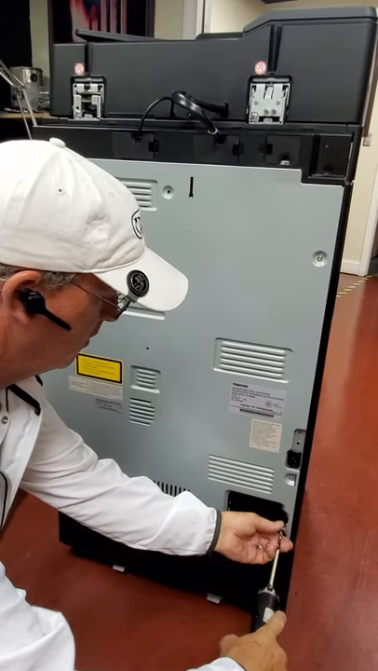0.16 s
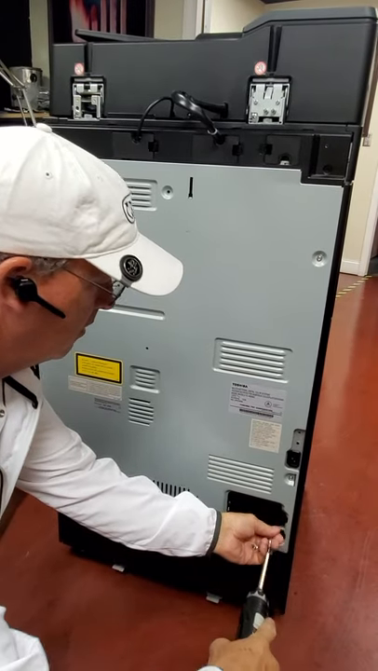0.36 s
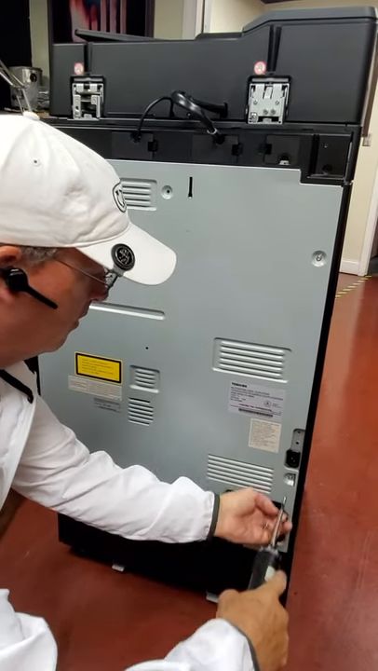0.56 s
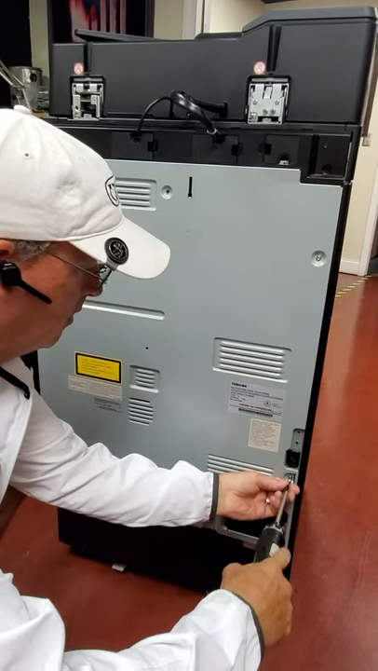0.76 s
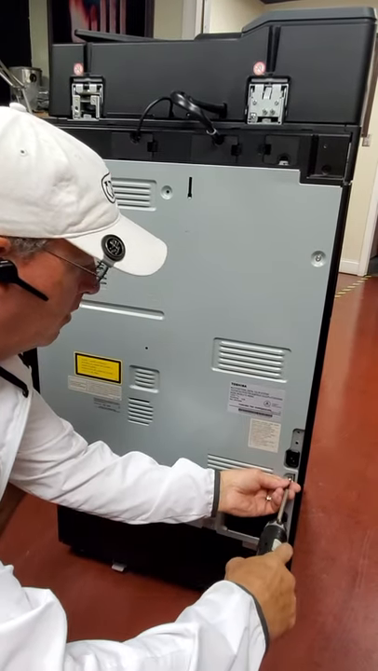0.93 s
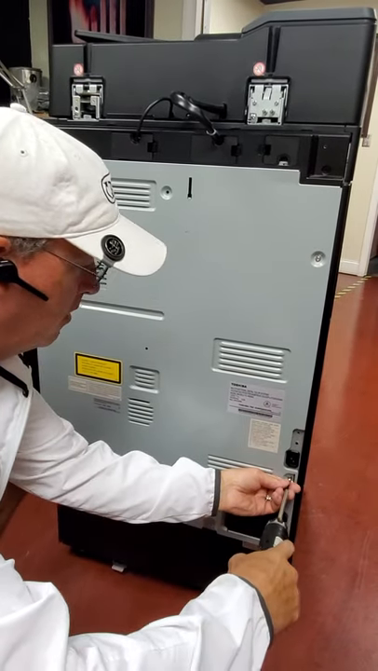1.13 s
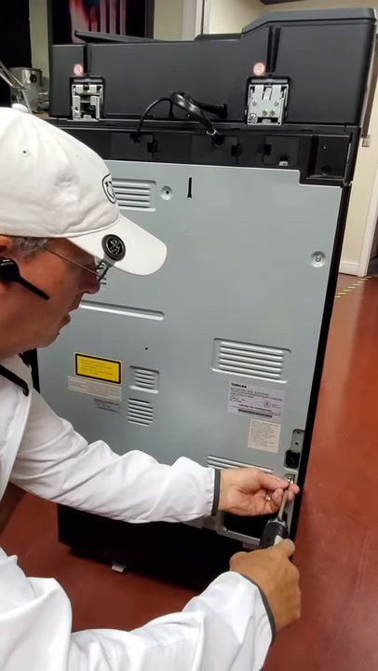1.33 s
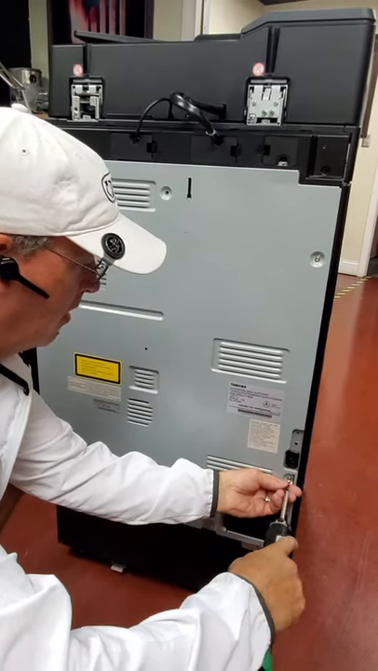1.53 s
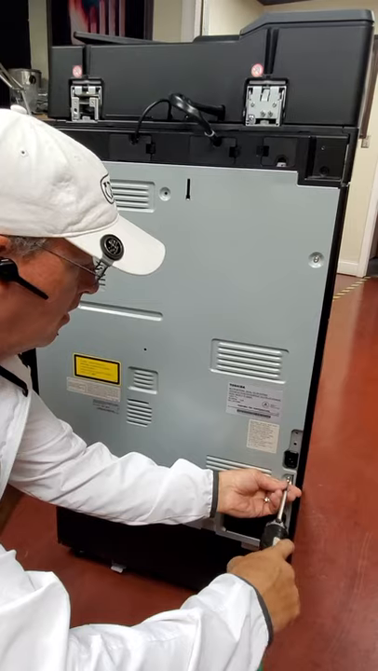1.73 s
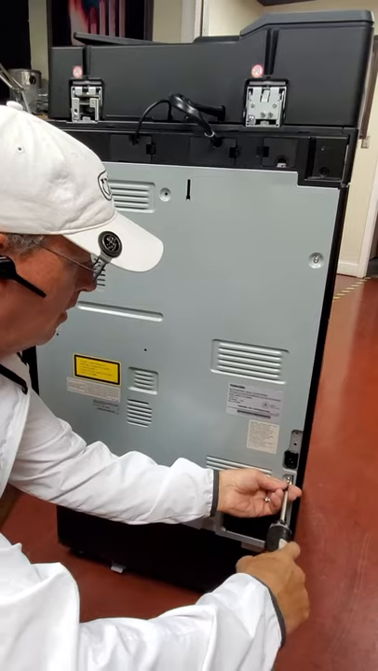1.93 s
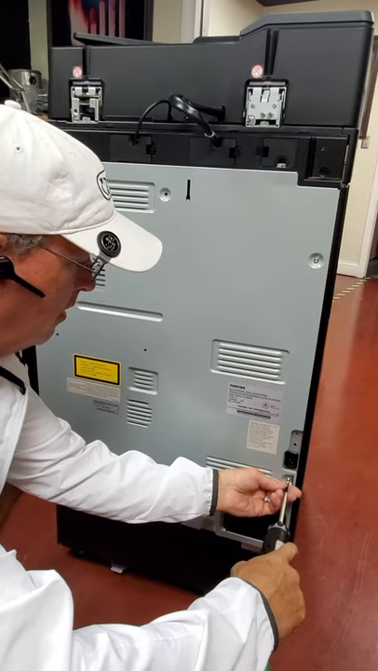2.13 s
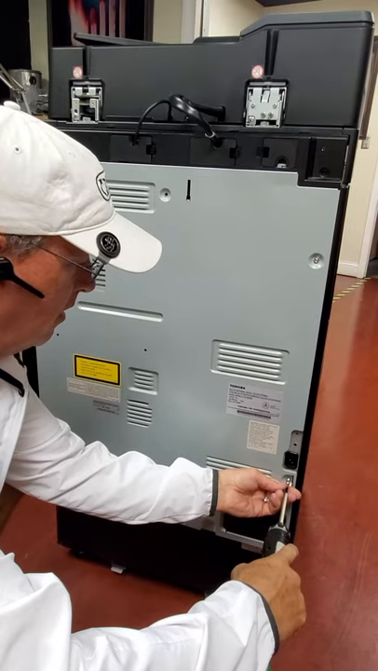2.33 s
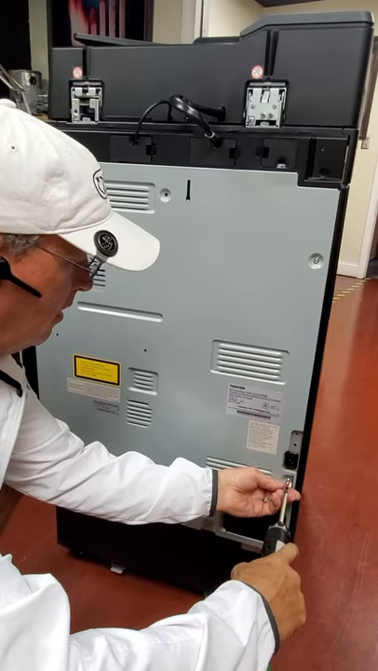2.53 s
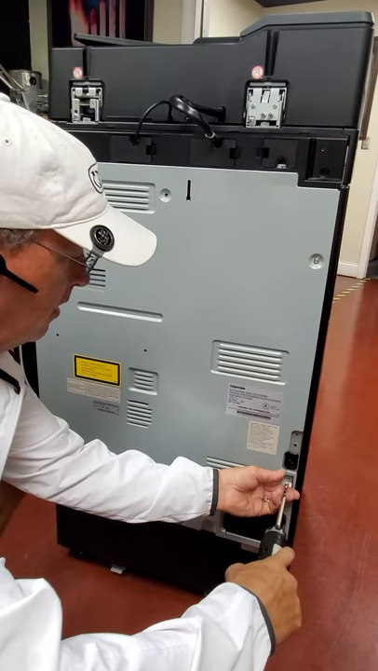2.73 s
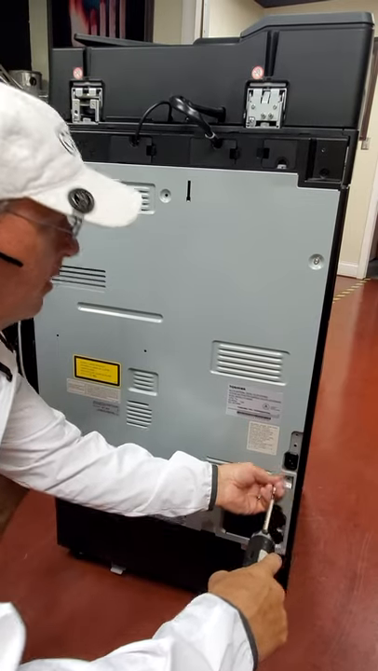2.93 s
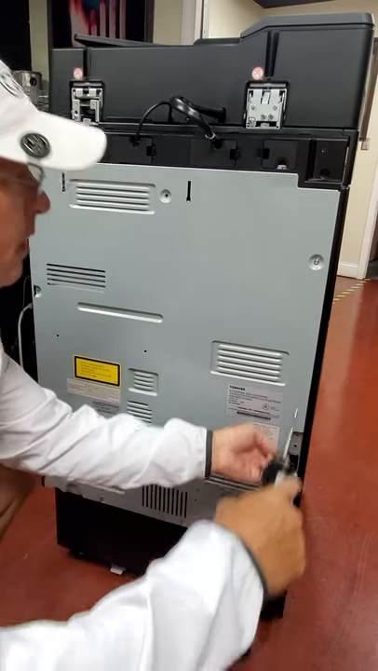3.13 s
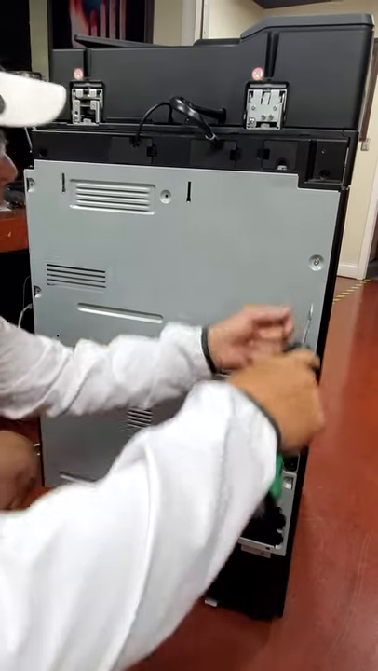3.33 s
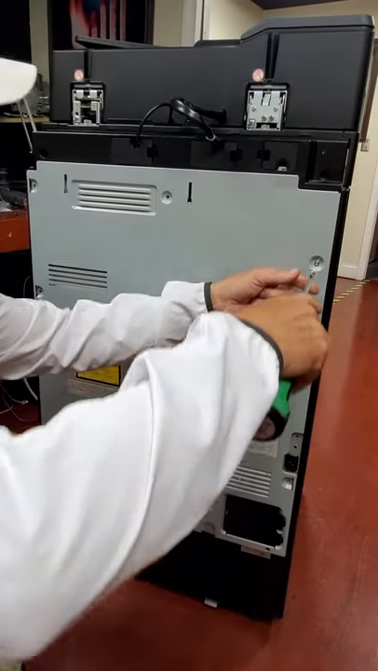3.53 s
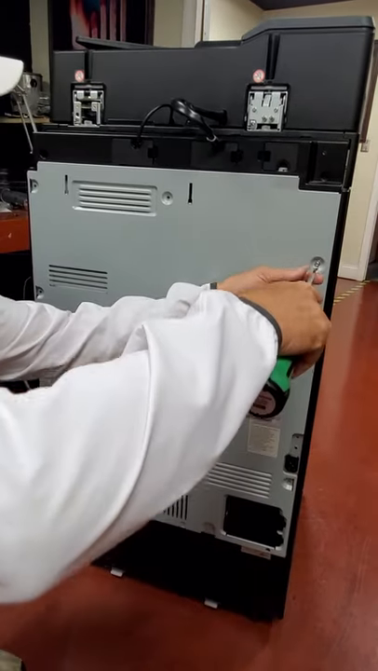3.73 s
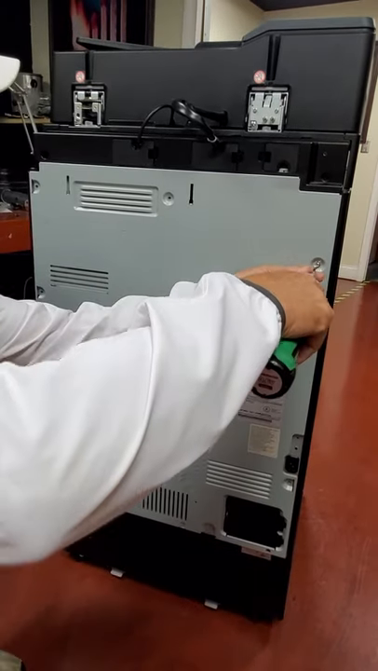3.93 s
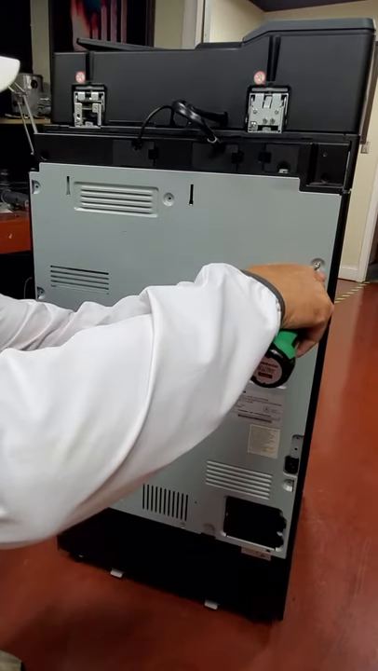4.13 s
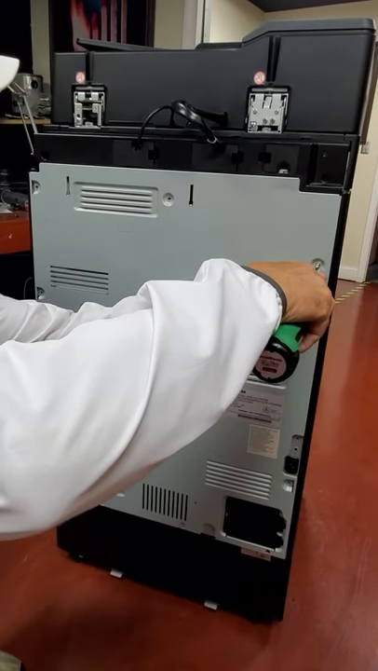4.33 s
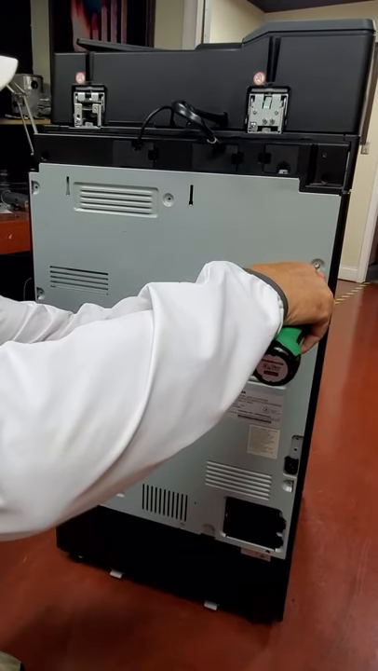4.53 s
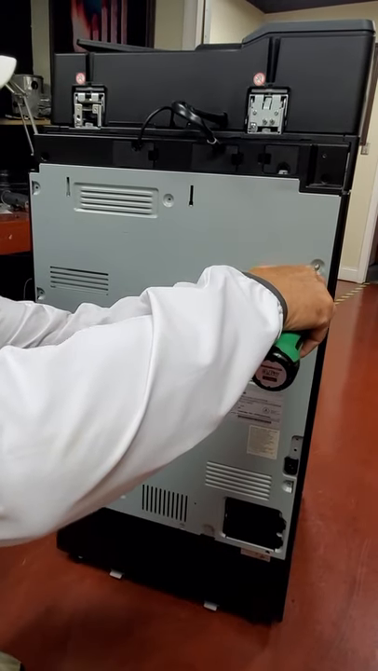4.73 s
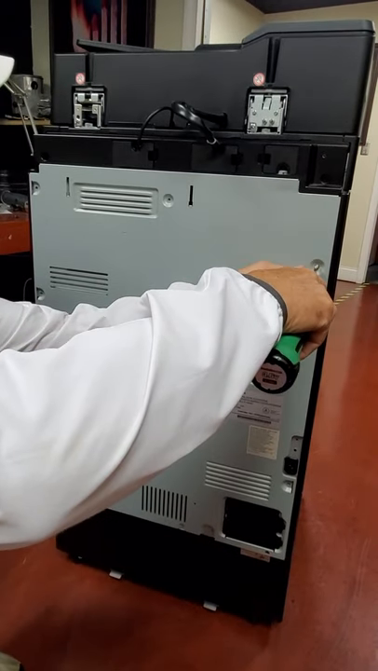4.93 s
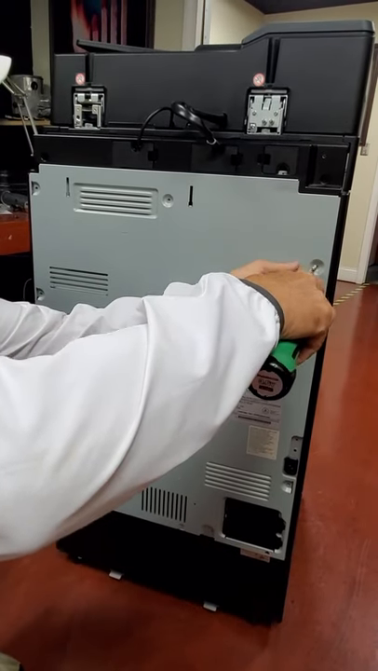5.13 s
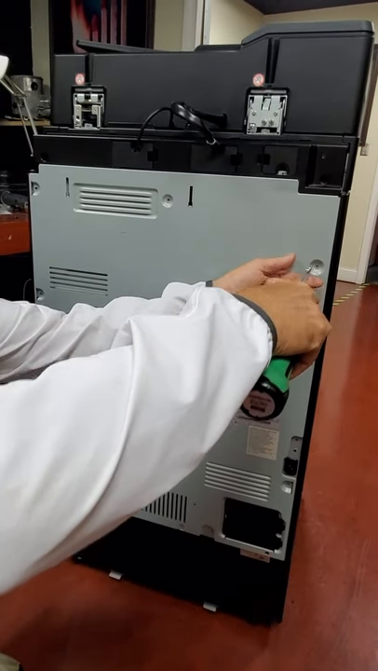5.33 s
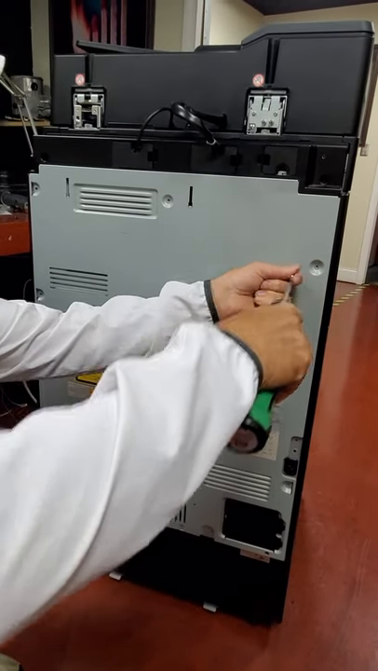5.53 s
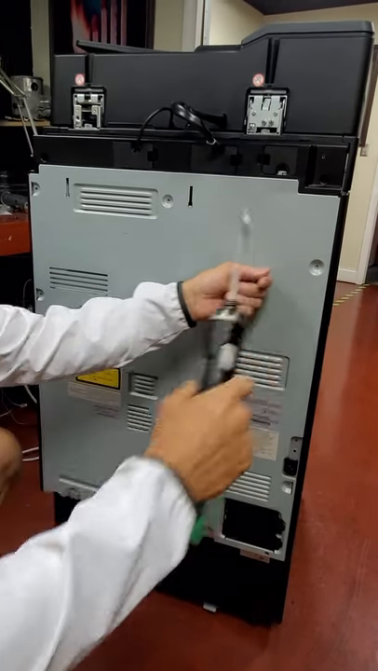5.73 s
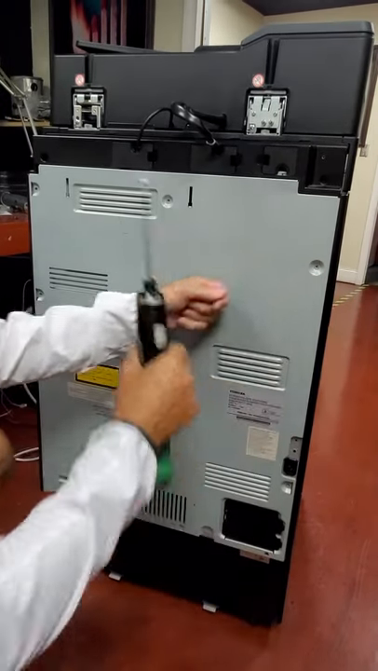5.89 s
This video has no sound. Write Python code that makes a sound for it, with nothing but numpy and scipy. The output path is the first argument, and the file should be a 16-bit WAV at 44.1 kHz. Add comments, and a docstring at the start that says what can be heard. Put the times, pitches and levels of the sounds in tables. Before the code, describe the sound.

Close stereo sound in a small, hard-surfaced room. A handheld electric screwdriver's gritty gear rattle and high whine fall away; faint taps follow. Two trigger bursts come next, the first longer, the second shorter, each with a brief coarse rasp as a screw loosens from a thin resonant panel, then a falling whirr. Between them the steel bit skids, clicks and bumps on metal. A few faint clicks end it over quiet room noise.

```python
"""Motor and gears coast to a stop at the start; two powered runs of a cordless screwdriver follow.
Motor orders whine, and tooth strikes excite the gear housing. In the later runs a screw rasps by stick-slip
as it is backed out of a cooker's sheet-metal panel. Slides, bumps, taps and scrapes excite the steel bit
and the sheet as impulses or friction noise. A small hard room adds diffuse echoes and faint steady noise."""
import sys
import numpy as np
from scipy import signal
from scipy.fft import rfft, irfft
from scipy.io import wavfile
from scipy.ndimage import uniform_filter1d

SR = 44100
rng = np.random.default_rng(int(sys.argv[2]) if len(sys.argv) > 2 else 0)


def unload_audio(sound):
    """Save the sound as a 16-bit wav file, at the path given as the first command line argument."""
    columns = np.transpose(np.atleast_2d(sound))
    # keep every value between -1 and 1, then stretch to whole-number steps
    steps = np.round(np.clip(columns, -1, 1) * 32767)
    wavfile.write(sys.argv[1], SR, steps.astype(np.int16))


N = 262836
TIME = np.arange(N) / SR

# Levels in the tables are relative to the gains of the functions that use them.
# trigger pulls: pressed_s, released_s, driven_rattle_db, coasting_rattle_db, friction_turns_per_s2
TRIGGER_PULLS = [(-.3, 0.032, -31, -30.5, 326), (1.444, 2.64, -31.5, -29, 335),
                 (4.305, 5.093, -31.5, -29, 270)]
# motor speed under power, one curve a run, before spin-up and flutter: time_s, speed_turns_per_s
POWERED_SPEED = [
    [(0, 330)],
    [(1.8, 324), (1.97, 338), (2.04, 339), (2.13, 335.5), (2.33, 341.5), (2.52, 342), (2.62, 337)],
    [(4.47, 324), (4.55, 333.5), (4.73, 336), (4.82, 344.5), (5.09, 346)],
]
# tones of motor and gears at full speed: multiple_of_motor_speed, first_run_db, second_run_db, third_run_db
MOTOR_ORDERS = [(1, -51, -59, -55), (2, -52.5, -64.5, -53), (3, -55, -55, -52), (3.5, -51, -73, -49.5),
                (4, -48, -55.5, -51.5), (5, -60, -51.5, -56), (5.5, -71, -71, -49), (9, -74, -56.5, -53),
                (9.5, -47.5, -49, -49), (10.5, -63, -58, -55), (12, -42, -51, -55), (17.5, -38.5, -49, -58),
                (18, -59, -51, -53)]
# narrow housing resonances that strengthen a passing tone: centre_hz, width_hz, boost_db
HOUSING_MODES = [(1007.7, 7.8, 14), (1360, 8, 11), (2971, 53, 13)]
# gearbox spectrum under power: frequency_hz, level_db
DRIVEN_SPECTRUM = [(60, -36.5), (130, -26), (330, -13), (480, -25), (780, -16), (1050, -8.5), (1400, -3),
                   (2200, -7), (3400, -1.5), (5200, -7.5), (6200, -5.5), (8000, -11), (9500, -23),
                   (15500, -6.5)]
# gearbox spectrum while coasting: frequency_hz, level_db
COASTING_SPECTRUM = [(150, -63), (320, -22.5), (500, -27), (800, -19), (1000, -18.5), (1300, -0.5),
                     (1600, 1.5), (2300, -6.5), (4100, -4), (4800, -7.5), (7200, -8.5), (9300, -23),
                     (15500, -14)]
# balance of the gearbox between the ports: frequency_hz, left_minus_right_db
PORT_BALANCE = [(150, 0), (350, -4.5), (700, -1.5), (1300, -0.5), (2600, -3), (4200, -8), (6500, 3),
                (9000, 7), (15000, 6)]
# unscrewing: bite_s, tightest_s, bite_db, tightest_db, loosening_db_per_s, turn_swell_db
SCREW_FRICTION = [(1.464, 1.646, -27, -27.5, 85, 1.2), (4.369, 4.655, -44, -34, 135, 5.5)]
# rasp spectra of the low and then the high screw: frequency_hz, level_db
RASP_SPECTRA = [
    [(45, -45), (62, -13), (80, -5), (115, -4.5), (380, -7), (550, -13), (1000, -10), (2000, -9.5),
     (4000, -10), (8000, -35)],
    [(45, -56), (62, -21), (85, -1), (160, -3.5), (330, 3.5), (500, -2), (700, -6), (1200, -10.5),
     (3000, -1), (8000, -52)],
]
# bit sliding over the screw head: start_s, length_s, level_db
BIT_SLIDES = [(1.213, 0.028, -52), (1.321, 0.044, -47.5), (3.444, 0.11, -41), (3.594, .05, -50),
              (4.093, 0.031, -36.5), (5.31, 0.021, -49.5), (5.61, 0.085, -52)]
# friction spectrum of a slide: frequency_hz, level_db
SLIDE_SPECTRUM = [(41, -46.5), (70, -13), (173, -2.5), (266, -8.5), (309, 1.5), (427, -8), (832, -5),
                  (1080, -9), (3090, -13), (8880, -34), (12000, -63), (15600, -32), (22000, -120)]
# soft bumps of hand and tool body on the panel: start_s, level_db, pitch_hz, decay_s (time constant)
BODY_BUMPS = [(1.351, -44, 150, .022), (1.407, -47, 140, .02), (3.436, -19.5, 302, 0.0019),
              (3.514, -21, 330, 0.0012), (4.122, -33, 242, 0.002), (4.657, -21.5, 300, 0.0064),
              (5.312, -39.5, 255, 0.0049), (5.943, -49.5, 328, 0.0066)]
# taps of bit and screws on the metal: time_s, clack_db, panel_thud_db, bright_tick_db
METAL_TAPS = [(.52, -71, -64.5, -58), (0.675, -55.5, -74, -56), (1.098, -38, -49.5, -58),
              (1.259, -40.5, -47, -73), (1.446, -40, -50, -45), (1.468, -28.5, -48, -46),
              (2.738, -54, -57, -24), (2.765, -51, -69, -28.5), (3.46, -43.5, -45.5, -38.5),
              (3.569, -40, -67, -38.5), (3.923, -41, -48.5, -39), (4.062, -46.5, -52, -44.5),
              (4.084, -37.5, -41.5, -59), (4.121, -40.5, -44, -47.5), (4.269, -52.5, -69, -53),
              (4.321, -38.5, -74, -62), (4.419, -27.5, -37, -25), (4.543, -28, -36.5, -39),
              (4.647, -30, -37.5, -30), (5.626, -46, -54.5, -68), (5.753, -45, -73, -50),
              (5.762, -63, -74, -52), (5.896, -53, -65, -49.5)]
# spectrum of the clack on steel: frequency_hz, level_db
CLACK_SPECTRUM = [(30, -55), (150, -25.5), (500, -4.5), (780, -18), (1100, 4), (1600, 4.5), (2200, 2),
                  (3000, 4.5), (4900, -1.5), (6200, -11), (9000, -30.5)]
# spectrum of the panel thud: frequency_hz, level_db
THUD_SPECTRUM = [(25, -45), (50, -34), (110, -11), (280, -8), (450, -2), (720, 11), (1000, -3.5),
                 (1800, -57)]
# spectrum of the tick at the bit's tip, and of the scrapes: frequency_hz, level_db
TICK_SPECTRUM = [(100, -80), (3500, -33), (6000, 0), (8000, 6), (9200, -8), (12000, -0.5), (15500, 5)]
# loose screw scraping across the tip of the bit: middle_s, length_s, level_db
TIP_SCRAPES = [(0.132, 0.094, -33.5), (0.674, .016, -53), (2.743, .05, -30), (5.768, 0.011, -32)]
# modes of the steel bit and its holder: frequency_hz, level_db, t60_s
BIT_MODES = [(1392, 6, 0.51), (1574, -7, 1), (1660, 0, 0.72), (2690, -9, .2), (3550, -5, 0.28),
             (4080, -11, 0.18)]
# modes of the sheet-metal panel: frequency_hz, level_db, t60_s
PANEL_MODES = [(103, -14, 0.43), (138.6, -15, 0.15), (167, -27, 0.42), (224, -26, 0.33), (276, -4, 0.75),
               (322.3, 17, 0.48), (384.7, 11, 1), (564.3, 12.5, 0.39), (727, 17.5, 0.1), (1210, -10, 0.213),
               (1770, 7, 0.35)]
# reverberation of the room: frequency_hz, t60_s
ROOM_DECAY = [(100, 0.39), (250, 0.47), (550, 0.51), (1400, 0.36), (3700, 0.35), (9700, 0.35),
              (16000, 0.28)]
# spectrum of the still room: frequency_hz, level_db
HUSH_SPECTRUM = [(15, -13), (25, -49), (63, -4.5), (145, -18.5), (180, -19), (206, -17), (373, -11.5),
                 (439, -19.5), (754, -12.5), (936, -19.5), (1330, -16.5), (1940, -19), (7920, -26),
                 (9070, -42), (16000, -24)]

TEETH = 9  # on the motor pinion
FULL_SPEED = 340  # turns per second, reference for pace
SPIN_UP_S, DRAG_S = .11, .5  # rise time; time constant of the speed-proportional drag
RATTLE_GROWTH, LOAD_DB = 1.458, 1.5  # exponent of pace; rise of the rattle while a screw is tight
MESH_DB, MESH_WIDTH_HZ = 13, 230  # whirr of the coasting gears
BITE_S, SCREW_TURN_S = .035, 0.1074  # time for the thread to bite; one turn of a screw
SLIDE_ATTACK_S, SLIDE_FADE_DB_PER_S = 0.029, 223
HUSH_DB = -69
PORT_GAP_S = 0.00054  # sound's travel time between the two listening ports
EDGE_HZ = 16000


def motor_speed(pressed, released, friction, powered):
    """Rotational dynamics: spin-up, powered speed, then viscous drag and dry friction; in turns per second."""
    spin_up = 1 - (1 - np.minimum(since(pressed) / SPIN_UP_S, 1)) ** 2
    speed = spin_up * np.interp(TIME, *np.transpose(powered))
    slowing = np.exp(-since(released) / DRAG_S)
    speed = np.maximum(speed * slowing - friction * DRAG_S * (1 - slowing), 0)
    flutter = 1 + .002 * wander(hz=30.11)
    return speed * flutter


def gear_teeth(speed, spread_db=3.5, throb=0.24, backlash=.15):
    """Periodic impact: each pinion tooth strikes once a turn, unevenly and harder on one side of the shaft."""
    turns = np.cumsum(speed) / SR
    tooth_phase = TEETH * turns + backlash * wander(hz=900)
    strikes = np.diff(np.floor(tooth_phase), prepend=0) > 0
    size = amp(spread_db * rng.standard_normal(N)) * (1 + throb * np.cos(2 * np.pi * turns))
    train = strikes * size * rng.choice([-1, 1], N)
    # even out the power over about 50 ms, whatever the strike rate
    local_power = abs(uniform_filter1d(train ** 2, size=2200))
    return train / np.sqrt(local_power + 1e-3)


def gearbox(speeds, load, gear_db=2.0, coast_db=1, grip=0.17, power_from=170, power_span=150):
    """Source and filter: tooth strikes ring the housing; the loose mesh sweeps down as a broad whirr."""
    driven, coasting, mesh = np.zeros((3, N))
    for speed, (_, _, driven_db, loose_db, _) in zip(speeds, TRIGGER_PULLS):
        pace = speed / FULL_SPEED
        strikes = gear_teeth(speed) * amp(LOAD_DB * load) * pace ** RATTLE_GROWTH
        # crossfade by speed, in turns per second, from the loose to the driven rattle
        power = np.clip((speed - power_from) / power_span, 0, 1)
        loose = amp(loose_db) * strikes * (1 - power)
        driven += amp(driven_db) * strikes * power
        coasting += loose
        mesh += resonate(loose, TEETH * speed, MESH_WIDTH_HZ) * np.sqrt(pace)
    sound = amp(gear_db) * through(driven, colour(DRIVEN_SPECTRUM)) + amp(MESH_DB) * mesh
    # at the high screw the hand wraps the housing and damps its main ring
    main_band = signal.butter(1, (3200, 4400), "bandpass", fs=SR, output="sos")
    sound -= grip * signal.sosfilt(main_band, sound) * (TIME >= TRIGGER_PULLS[-1][0])
    coast = through(coasting, colour(COASTING_SPECTRUM))
    sound += amp(coast_db) * ringing(coast, BIT_MODES, ring_db=-30.5)
    lean_db = read(PORT_BALANCE, np.fft.rfftfreq(N, 1 / SR)) / 2
    placed = room(sound, wet_db=8, shift_hz=70.27)
    return irfft(rfft(placed) * amp([lean_db, -lean_db]), N)


def singing(hz):
    """Resonance: the gain that the housing modes give to a tone of this pitch."""
    power = 1
    for centre, width, db in HOUSING_MODES:
        power = power + amp(db) ** 2 / (1 + (2 * (hz - centre) / width) ** 2)
    return np.sqrt(power)


def whine(speeds, growth=2.53, wobble=0.0014):
    """Order tones: multiples of the shaft rate follow the motor and swell on crossing a housing resonance."""
    out = np.zeros(N)
    for run, speed in enumerate(speeds):
        running = speed > 0
        turns = (np.cumsum(speed) / SR + wobble * wander(hz=120))[running]
        pace = speed[running] / FULL_SPEED
        for order, *db in MOTOR_ORDERS:
            # the shaft tone fades least as the motor slows
            fade = pace ** (growth * min(order + 1, 3))
            gain = amp(db[run]) * fade * singing(order * speed[running])
            out[running] += gain * np.sin(2 * np.pi * (order * turns + rng.random()))
    return room(np.sqrt(2) * out, wet_db=-7, lag_s=.00005)


def thread_friction(bite, tightest, bite_db, tight_db, loosening, swell_db):
    """Friction envelope: the thread bites, reaches its tightest turn and works loose, swelling every turn."""
    db = np.interp(TIME, [bite, tightest], [bite_db, tight_db]) - loosening * since(tightest)
    swell = np.cos(2 * np.pi * (TIME - tightest) / SCREW_TURN_S)
    return np.minimum(since(bite) / BITE_S, 1) * amp(db + swell_db * swell)


def screws(frictions):
    """Stick-slip excitation: the thread jerks through its hole and shakes the whole sheet."""
    rasp = 0
    for friction, spectrum in zip(frictions, RASP_SPECTRA):
        jerks = through(slips(per_s=1800, spread_db=3.0), colour(spectrum))
        rasp += friction * evened(ringing(jerks, PANEL_MODES, ring_db=-18.5))
    return room(rasp, wet_db=4.0, shift_hz=12)


def sliding(slide_db=-1):
    """Sliding friction: the bit skids over screw head and sheet while it looks for its seat."""
    jerks = through(slips(per_s=900, spread_db=2.5), colour(SLIDE_SPECTRUM))
    skid = evened(ringing(jerks, PANEL_MODES, ring_db=-38))
    pressure = 0
    for start, length, db in BIT_SLIDES:
        attack = np.minimum(since(start) / SLIDE_ATTACK_S, 1)
        pressure += attack * amp(db - SLIDE_FADE_DB_PER_S * since(start + length))
    return amp(slide_db) * room(skid * pressure, wet_db=2.5)


def bumps():
    """Damped oscillation: a soft bump flexes the sheet and rings its modes; the deepest motion is weak."""
    t, out = np.arange(SR // 8) / SR, np.zeros(N)
    for start, db, hz, decay in BODY_BUMPS:
        part = out[round(start * SR):][:len(t)]
        push = amp(db) * np.sin(2 * np.pi * hz * t) * np.exp(-t / decay)
        part += push[:len(part)]
    # the deepest motion does not radiate
    radiating = signal.butter(4, 110, "highpass", fs=SR, output="sos")
    flex = signal.sosfilt(radiating, out)
    return room(ringing(flex, PANEL_MODES, ring_db=-33), wet_db=6)


def chatter(blows, chatter_db=-7, span_s=.035, count=5):
    """Repeated impact: loose metal touches again a few times after each blow, more lightly with delay."""
    out = blows.copy()
    for at in np.flatnonzero(blows):
        delay = rng.random(count)
        touches = np.minimum(at + (delay * span_s * SR).astype(int), N - 1)
        out[touches] += blows[at] * amp(chatter_db) * (1 - delay)
    return out


def taps(clack_db=26.0, thud_db=28, tick_db=27):
    """Impulse response: each tap clacks on the steel, ticks at the bit's tip and thuds in the panel."""
    clack, thud, tick = np.zeros((3, N))
    for s, steel_db, panel_db, tip_db in METAL_TAPS:
        at = round(s * SR)
        clack[at] = amp(steel_db + clack_db)
        thud[at] = amp(panel_db + thud_db)
        tick[at] = amp(tip_db + tick_db)
    clack = through(chatter(clack), colour(CLACK_SPECTRUM))
    thud = through(thud, colour(THUD_SPECTRUM))
    steel = room(ringing(clack, BIT_MODES, ring_db=-35), wet_db=11)
    sheet = room(ringing(thud, PANEL_MODES, ring_db=-22.5), wet_db=11.0)
    tip = room(through(tick, colour(TICK_SPECTRUM)), wet_db=9)
    return steel + sheet + tip


def scrapes():
    """Friction of steel on steel: a brief bright swell of tiny jerks."""
    skid = evened(through(slips(per_s=1900, spread_db=-1.0), colour(TICK_SPECTRUM)))
    pressure = 0
    for middle, length, db in TIP_SCRAPES:
        position = np.clip((TIME - middle) / length, -.5, .5)
        pressure += amp(db) * np.cos(np.pi * position) ** 2
    return room(skid * pressure, wet_db=-10)


def hush():
    """Diffuse-field noise: the faint steady sound of the room."""
    gain = amp(read(HUSH_SPECTRUM, np.fft.rfftfreq(N, 1 / SR)))
    return amp(HUSH_DB) * evened(irfft(rfft(diffuse(count=N)) * gain, N))


def room(x, wet_db, shift_hz=0.71, lag_s=.00018, count=3):
    """Reverberation: direct sound, left port first, plus echoes that shift as the source moves or spins."""
    wet = np.zeros((2, N))
    for k in range(count):
        share = np.cos(np.pi * (shift_hz * TIME + k / count)) * np.sqrt(2 / count)
        wet += [through(x * share, tail) for tail in echoes()]
    direct = np.array([x, np.roll(x, round(lag_s * SR))])
    return (direct + amp(wet_db) * wet) / np.hypot(1, amp(wet_db))


def echoes():
    """Exponential decay: a dense room tail in which each band dies at its own speed; left energy is one."""
    hz, t, bands = signal.stft(diffuse(count=SR // 2), SR, nperseg=256)
    decay = amp(-60 * t / read(ROOM_DECAY, hz)[:, None])
    tail = signal.istft(bands * decay, SR, nperseg=256)[1]
    return tail / np.linalg.norm(tail[0])


def diffuse(count):
    """Spatial coherence: noise from all sides is alike at both ports in the bass, unrelated higher up."""
    a, b = rfft(rng.standard_normal((2, count)))
    same = np.sinc(2 * np.fft.rfftfreq(count, 1 / SR) * PORT_GAP_S)
    return irfft(np.array([a, same * a + np.sqrt(1 - same ** 2) * b]), count)


def slips(per_s, spread_db):
    """Stick-slip: a random train of small and large jerks, of rms one."""
    size = amp(spread_db * np.minimum(rng.exponential(1, N), 4)) * rng.choice([-1, 1], N)
    return evened(size * (rng.random(N) < per_s / SR))


def ringing(x, modes, ring_db):
    """Modal superposition: a metal part passes a push straight on and also rings with its modes."""
    t = np.arange(SR // 2) / SR
    ring = sum(amp(db - 60 * t / t60) * np.cos(2 * np.pi * hz * t) for hz, db, t60 in modes)
    return x + amp(ring_db) * through(x, ring / np.linalg.norm(ring))


def resonate(x, hz, width):
    """Heterodyning: shift the curve hz to zero, low-pass and shift back, a moving resonance of gain one."""
    turn = np.exp(2j * np.pi * np.cumsum(hz) / SR)
    r = np.exp(-np.pi * width / SR)
    smoothed = signal.lfilter([(1 - r) ** 2], [1, -2 * r, r * r], x / turn + 1e-18)
    return 2 * (turn * smoothed).real


def colour(points, size=4096):
    """Minimum phase: the causal impulse response of energy one with the given spectrum."""
    log_gain = np.log(amp(read(points, abs(np.fft.fftfreq(size, 1 / SR)))))
    pulse = np.fft.ifft(np.exp(np.conj(signal.hilbert(log_gain)))).real[:size // 2]
    return pulse / np.linalg.norm(pulse)


def through(x, response):
    """Convolution: passes a sound through an impulse response."""
    return signal.oaconvolve(x, response)[:N]


def wander(hz):
    """Low-passed noise: slow random variation of rms one, up to about the given rate."""
    f = np.fft.rfftfreq(N, 1 / SR)
    return evened(irfft(rfft(rng.standard_normal(N)) / (1 + (f / hz) ** 4), N))


def read(points, hz):
    """Interpolation: reads a table on a log-frequency axis."""
    f, value = np.transpose(points)
    return np.interp(np.log(hz + 1), np.log(f + 1), value)


def evened(x):
    """Normalisation: scales to an rms of one."""
    return x / np.sqrt(np.mean(x ** 2) + 1e-20)


def amp(db):
    """Logarithmic level: decibels to amplitude gain."""
    return 10 ** (np.asarray(db) / 20)


def since(s):
    """Elapsed time: seconds gone by since a moment, zero before it."""
    return np.maximum(TIME - s, 0)


def scene():
    """Superposition: screwdriver, screws, contact sounds and room add linearly."""
    speeds = []
    for (pressed, released, _, _, friction), powered in zip(TRIGGER_PULLS, POWERED_SPEED):
        speeds.append(motor_speed(pressed, released, friction, powered))
    frictions = [thread_friction(*row) for row in SCREW_FRICTION]
    load = sum(friction / friction.max() for friction in frictions)
    tool = gearbox(speeds, load) + whine(speeds)
    contacts = screws(frictions) + sliding() + bumps() + taps() + scrapes()
    return tool + contacts + hush()


def record(dry):
    """Band limiting: a linear-phase low-pass removes the highest treble."""
    lowpass = signal.firwin(511, EDGE_HZ, window=("kaiser", 9), fs=SR)
    return signal.oaconvolve(dry, lowpass[None], "same")


dry = scene()
out = record(dry)
unload_audio(out)
```